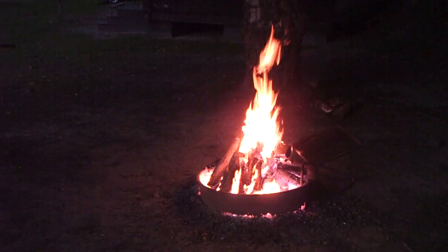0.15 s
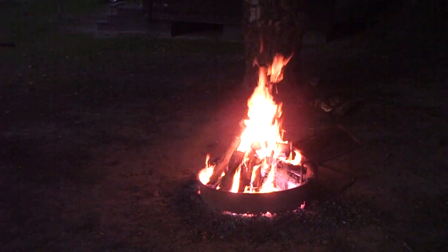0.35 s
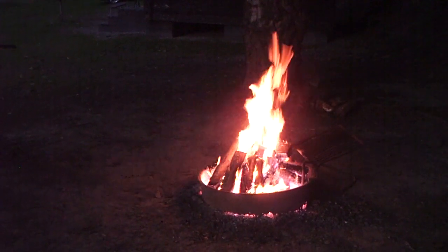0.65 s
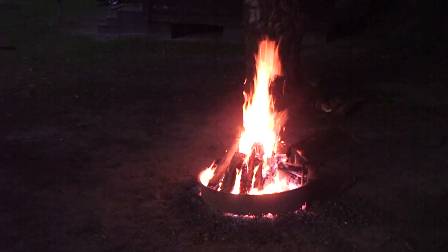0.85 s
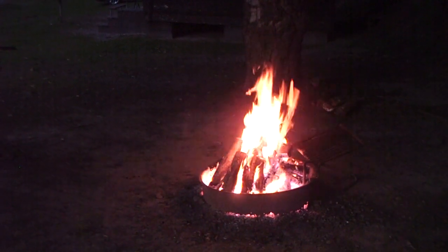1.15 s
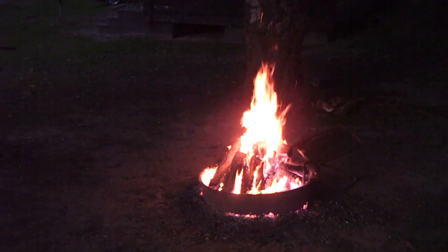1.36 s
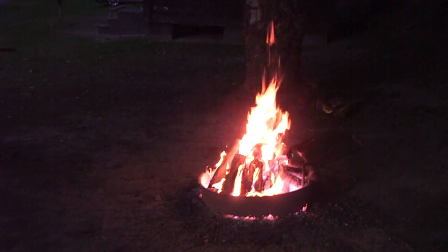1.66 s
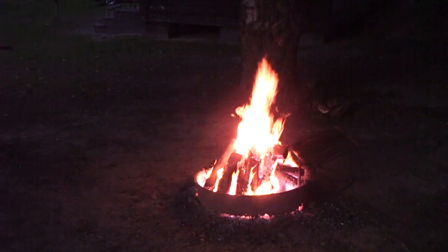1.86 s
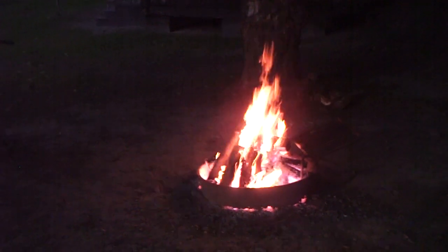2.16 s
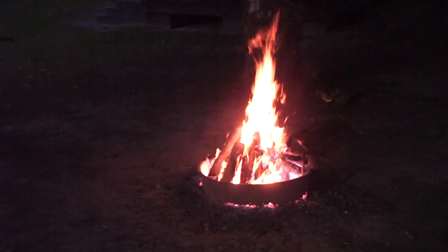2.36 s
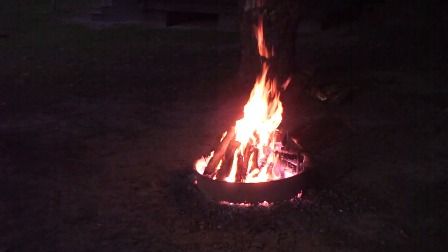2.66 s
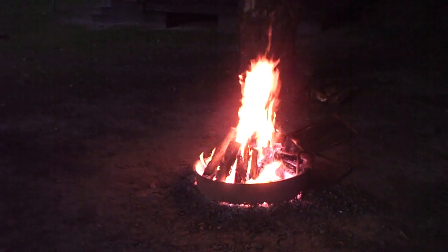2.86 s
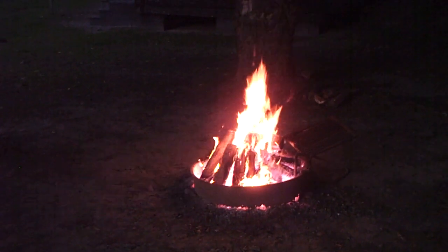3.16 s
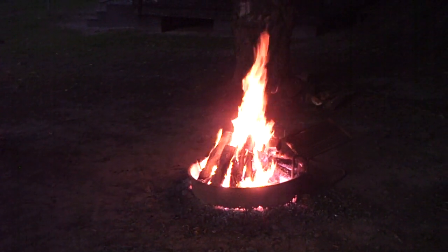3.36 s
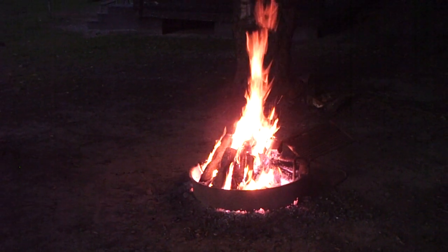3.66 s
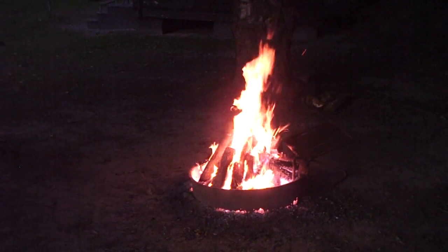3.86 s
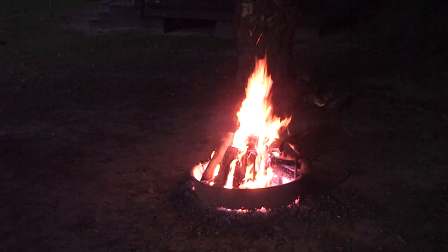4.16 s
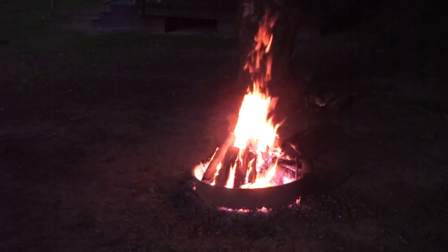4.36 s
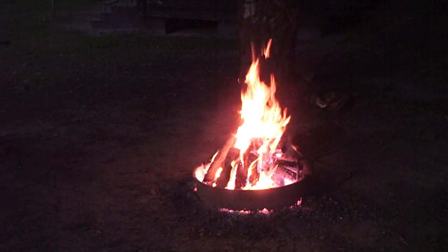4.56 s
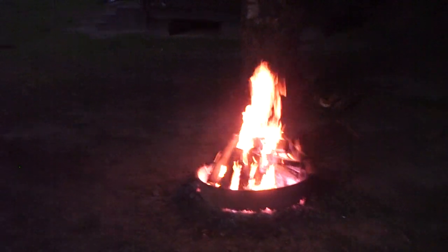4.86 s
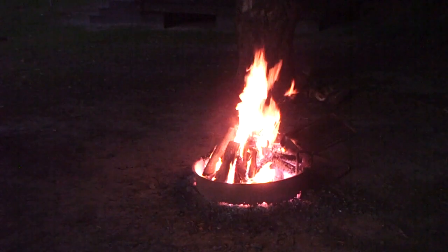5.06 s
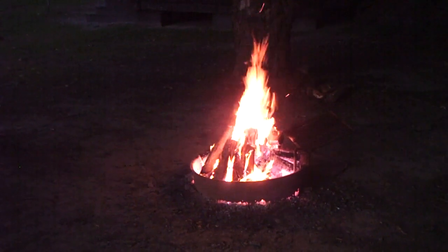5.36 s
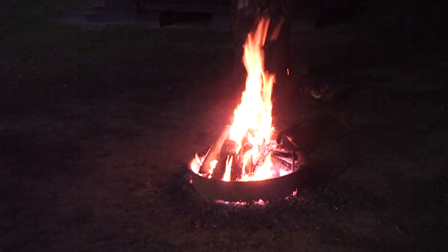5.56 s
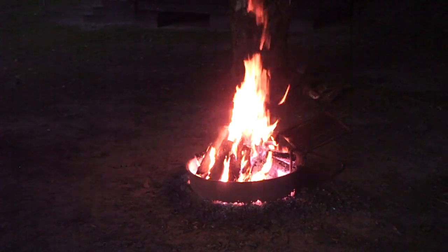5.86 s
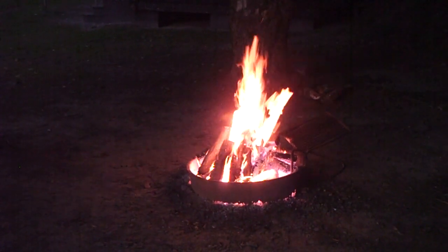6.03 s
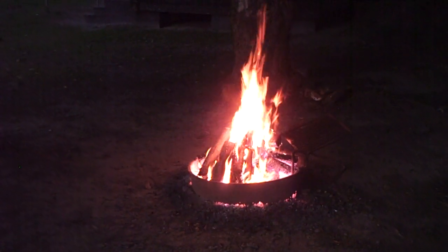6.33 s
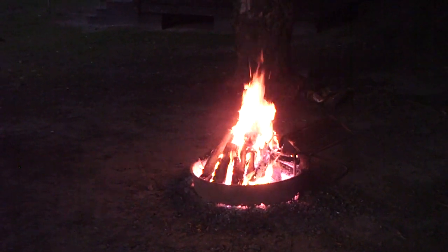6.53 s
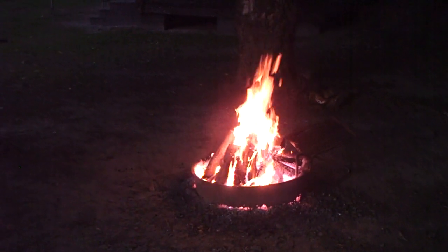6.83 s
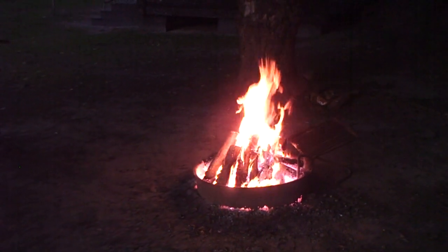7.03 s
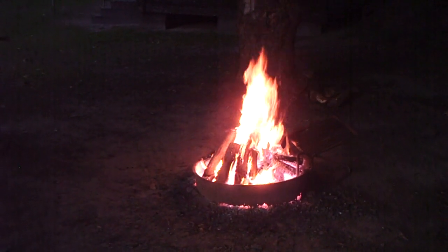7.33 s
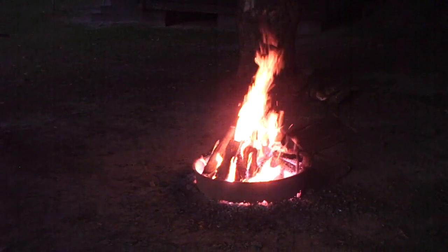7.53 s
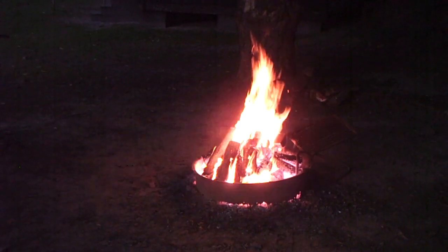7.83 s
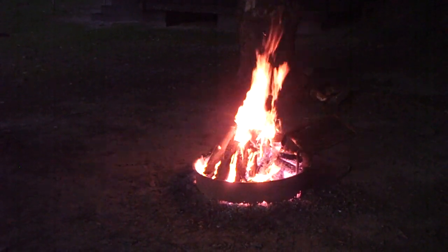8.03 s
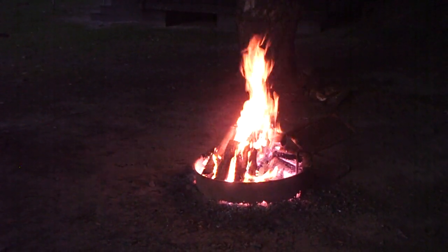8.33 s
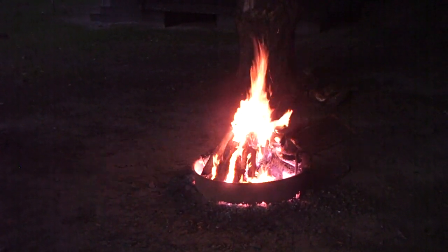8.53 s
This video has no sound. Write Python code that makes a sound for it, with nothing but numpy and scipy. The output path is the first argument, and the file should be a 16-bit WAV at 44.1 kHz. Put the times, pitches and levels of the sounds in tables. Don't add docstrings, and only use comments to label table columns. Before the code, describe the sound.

Outdoors at dusk, stereo microphones hear a campfire from a few metres, quiet and sparse, over soft hiss, thin far insect chorus and a deep fluttering engine rumble. Small snaps and woody knocks lead to a violent overloaded crack with short scattered echoes. Crackling resumes, a pop cluster flares around the middle, a cricket trills, steam squeals softly upward, then calmer pops and a low cricket close it.

```python
import sys
import numpy as np
from scipy import signal
from scipy.fft import rfft, irfft, next_fast_len
from scipy.io import wavfile
from scipy.ndimage import uniform_filter1d

SR = 44100
rng = np.random.default_rng(int(sys.argv[2]) if len(sys.argv) > 2 else 0)


def inscribe(sig):
    pcm = np.round(np.clip(np.atleast_2d(sig).T, -1, 1) * 32767)
    wavfile.write(sys.argv[1], SR, pcm.astype(np.int16))


def convert_level_to_amplitude(level_db):
    exponent = np.asarray(level_db, float) / 20
    return 10 ** exponent


N = 383229
T = np.arange(N) / SR
OPPOSED = np.array([[1], [-1]])


def level(x, db):
    return x * convert_level_to_amplitude(db) / np.sqrt(np.mean(x ** 2))


def peak(x, db):
    return x * convert_level_to_amplitude(db) / np.max(np.abs(x))


def colour(x, points):
    size = next_fast_len(N)
    hz, db = np.transpose(points)
    log_hz = np.log(np.arange(size // 2 + 1) * SR / size + 1)
    gain = convert_level_to_amplitude(np.interp(log_hz, np.log(hz), db, -200, -200))
    return irfft(rfft(x, size) * gain, size)[..., :N]


def band(x, hz, width_hz):
    return signal.lfilter(*signal.iirpeak(hz, hz / width_hz, fs=SR), x)


def band_twice(x, hz, width_hz):
    return band(band(x, hz, width_hz), hz, width_hz)


def walk(rate_hz):
    k = int(SR / rate_hz)
    held = np.repeat(rng.standard_normal(N // k + 1), k)
    return 1.6 * uniform_filter1d(uniform_filter1d(held, k), k)[:N]


def add(out, s, sound, pan_db):
    i = int(s * SR)
    out[:, i:i + sound.shape[-1]] += sound[..., :N - i] * convert_level_to_amplitude(OPPOSED * pan_db / 2)


# time in seconds, level in dB.
ENGINE_LOAD = [(0.0, -45), (0.09, -49), (0.87, -46.5), (1.04, -53), (1.23, -48), (4.72, -48), (4.74, -60),
               (4.81, -47), (5.23, -49), (5.54, -46), (5.57, -52), (6.07, -46), (6.27, -55), (6.32, -48.5),
               (7.6, -48.5), (7.65, -51), (7.72, -47), (8.69, -49.5)]
# frequency in Hz, rms level in dB.
MAINS_HUM = [(30.2, -64), (60.1, -57), (120., -67)]


def engine():
    spread = rng.standard_normal((N // 1000, 2)).T
    times = np.cumsum(1 + .13 * spread[0]) / 31.8 + .002
    inside = times < T[-1]
    firing = np.zeros(N)
    firing[(times[inside] * SR).astype(int)] = -convert_level_to_amplitude(2.9 * spread[1][inside])
    t = T[:1024] - T[512]
    dip = np.exp(-np.abs(t) / .0016) + 1.2 * np.exp(-(t / 0.0033) ** 2)
    dips = signal.fftconvolve(firing, dip, "same")
    dips = signal.sosfiltfilt(signal.butter(2, 24, "high", fs=SR, output="sos"), dips)
    rumble = colour(rng.standard_normal(N), [(8, -32), (18, 3.0), (60, -0.5), (110, -11), (200, -22.5),
                                             (400, -34.5), (900, -41)])
    hum = sum(np.sqrt(2) * convert_level_to_amplitude(db + 0.758 * walk(2.2)) * np.sin(2 * np.pi * hz * T) for hz, db in MAINS_HUM)
    surge_db, surge_rate_hz = 1.03, 14
    load_db = np.interp(T, *np.transpose(ENGINE_LOAD)) + 0.78 + surge_db * walk(surge_rate_hz)
    return (level(dips, -2.5) + level(rumble, -4.0)) * convert_level_to_amplitude(load_db) + hum


# frequency in Hz, density in dB per Hz.
AIR_SHARED = [(120, -108), (170, -86), (450, -103), (900, -104), (1250, -107), (1900, -107), (2700, -107.5),
              (3900, -107), (4400, -100), (4800, -92), (5100, -96), (6100, -111), (7400, -116),
              (13100, -117)]
# frequency in Hz, density in dB per Hz.
AIR_OPPOSED = [(150, -143), (290, -111), (900, -111), (1850, -115), (2300, -124), (3300, -117),
               (4200, -124), (4750, -101), (5050, -101), (5600, -117), (6500, -115), (8300, -117),
               (13100, -117)]


def air():
    embers = (rng.random(N) < 80 / SR) * rng.uniform(-1, 1, N) * 10
    mid = colour(rng.standard_normal(N) * convert_level_to_amplitude(0.34 * walk(4.4)) + embers, AIR_SHARED)
    side = colour(rng.standard_normal(N), AIR_OPPOSED)
    return (mid + side * OPPOSED) * np.sqrt(SR / 2)


def trill(hz, rate_hz, duty, droop_hz):
    phase = np.cumsum(rate_hz * (1 + .008 * walk(7.2))) / SR % 1
    stroke = np.sin(np.pi * np.minimum(phase / duty, 1)) ** 2
    tone = np.sin(2 * np.pi * np.cumsum(hz - droop_hz * (phase / duty - .5)) / SR)
    return level(stroke * tone * convert_level_to_amplitude(0.7 * walk(40)), 0)


def song(rows):
    attack_s, release_s = .25, .05
    out = np.zeros(N)
    for start, end, *db in rows:
        swell = np.clip(np.minimum((T - start) / attack_s, (end - T) / release_s), 0, 1)
        out += swell * convert_level_to_amplitude(np.interp(T, (start, end), db))
    return out


# start in seconds, end in seconds, level at start in dB, level at end in dB.
LOW_SONGS = [
    (2.1, 3.95, -67.5, -70),
    (6.98, 9.0, -69, -68),
]
# start in seconds, end in seconds, level at start in dB, level at end in dB.
HIGH_SONGS = [
    (4.91, 6.25, -58.5, -60),
]


def insects():
    low = trill(2450, 43.8, .92, 80) * song(LOW_SONGS) * convert_level_to_amplitude(-3.5)
    high = trill(4800, 59.5, .6, 300) * song(HIGH_SONGS) * convert_level_to_amplitude(-5.0)
    noise = rng.standard_normal((3, N))
    far = band_twice(noise[:2], 7900, 200)
    drone = band_twice(noise[2], 2290, 380) * convert_level_to_amplitude(1.3 * walk(1.5))
    far_chorus = level(far + .25 * far[::-1], -80.5) + level(drone, -76)
    return low * convert_level_to_amplitude(-.4 * OPPOSED) + high + far_chorus


# time in seconds, level in dB.
GAS_FLARES = [
    (0.004, -50),
    (2.63, -45.5),
    (3.73, -65),
    (4.86, -45),
    (7.09, -59),
    (8.28, -63),
    (8.37, -62),
]


def flame():
    rise_s, fall_s = 0.019, .05
    roar = band(rng.standard_normal(N), 330, 220) * convert_level_to_amplitude(2.5 * walk(11))
    gain = convert_level_to_amplitude(-68 + 2.3 * walk(1.6))
    for s, db in GAS_FLARES:
        gain += convert_level_to_amplitude(db) * np.exp(-np.maximum((s - T) / rise_s, (T - s) / fall_s))
    return level(roar, -10.0) * gain


# start in seconds, peak in dB, pitch in Hz, t60 in seconds.
LOG_KNOCKS = [(.138, -45, 560, 0.038), (.343, -50, 417, 0.021), (.475, -53, 453, .04),
              (.519, -51, 480, 0.062), (1.155, -40, 836, 0.039), (1.48, -50.5, 450, 0.028),
              (2.15, -54.5, 1030, .04), (2.19, -54.5, 883, .04), (2.26, -52, 552, 0.053),
              (2.637, -40, 680, .03), (3.718, -50.5, 647, 0.047), (4.833, -46.5, 400, 0.033),
              (4.864, -44, 713, 0.15), (5.959, -54.5, 630, 0.073), (7.076, -46.5, 562.6, .05),
              (7.84, -49, 240, 0.12), (7.939, -64, 624, 0.057), (8.203, -51.5, 623, .05),
              (8.26, -52, 266.6, 0.13), (8.355, -48.5, 275, 0.38)]


def knocks():
    out, t = np.zeros((2, N)), T[:4096]
    for s, db, hz, t60_s in LOG_KNOCKS:
        fade = np.exp(-np.log(1000) * t / np.clip(t60_s, .01, .2))
        noise = rng.standard_normal(len(t)) * fade ** 2
        rattle = peak(band(band(noise, 0.52 * hz, 1.6 * hz), 1.18 * hz, 0.64 * hz), 0.96)
        add(out, s, peak(np.sin(2 * np.pi * hz * t) * fade + rattle, db), 0)
    return out


# start in seconds, peak in dB, thump in dB relative to the peak,
# brightness in dB per octave above.
SAP_POPS = [(0.188, -62, 4, -12), (0.3433, -37.5, -30, 0), (0.606, -52, -5, -10), (0.7354, -49, -7, -3),
            (0.7579, -46, -4, -6), (0.9293, -47, -17, -4), (1.1548, -45, 2, -12), (1.248, -59, -12, 11),
            (1.3327, -42, -15, -10), (1.482, -39, -15, 6), (1.8804, -48, -18, -2), (2.4376, -59, 10, 5),
            (2.5795, -39.5, -10, -6), (2.7646, -39.5, -16, 7), (3.1558, -41, -24.5, -15),
            (3.718, -42, -20, -3), (4.0775, -45, -21, -4), (4.1154, -50, 1, 2), (4.2962, -43, -13, 10),
            (4.8204, -41, -17, -14), (4.834, -34.5, -14, 1), (4.8492, -33, -25, 2), (4.865, -39, -6, 7),
            (4.8732, -37, -6, 8), (5.242, -49, -0.5, 6), (5.4041, -47.5, -9, 9.5), (5.9595, -39.5, -16, -5),
            (7.077, -44.5, -3, -1), (7.6605, -51, -0.5, 5), (8.2039, -31, -10, -18)]
# start in seconds, peak in dB.
FAINT_TICKS = [(0.1524, -67), (0.2173, -64), (0.4081, -64), (1.3059, -55), (1.4534, -60), (1.8476, -59),
               (1.8722, -52), (2.0486, -49), (2.7499, -50), (3.0265, -47.5), (3.2782, -52), (3.5718, -54.5),
               (4.1394, -47), (4.9016, -54), (5.431, -50), (6.3609, -57), (6.4996, -59), (6.5366, -47),
               (6.941, -55), (8.0481, -58), (8.22, -58)]


def pops():
    out, t = np.zeros((2, N)), T[:2048]
    tick_thump_db, tick_bright_db = -12, -0.5
    ticks = [(s, db, tick_thump_db, tick_bright_db) for s, db in FAINT_TICKS]
    for s, db, thump_db, bright_db in SAP_POPS + ticks:
        debris = np.exp(-t / .0009) + convert_level_to_amplitude(-14.0) * np.exp(-t / 0.011)
        burst = rng.standard_normal(len(t)) * debris
        pan_db = 0.94 * burst[1]
        burst[0] += 5
        zones = ((1750, 1300, thump_db), (2810, 1600, 0), (4830, 1500, .8 * bright_db - 0.1),
                 (6800, 2200, 1.277 * bright_db - 13.5))
        pop = sum(peak(band_twice(burst, hz, width_hz), db + zone_db - 3.0) for hz, width_hz, zone_db in zones)
        add(out, s + 0.00061, pop, pan_db)
    return out


# start in seconds, peak in dB, length in seconds, centre in Hz.
STEAM_SPITS = [(0.189, -61.5, 0.079, 4470), (0.761, -63, 0.13, 4460), (1.33, -59.5, 0.049, 4500),
               (1.869, -52.5, 0.074, 4700), (1.99, -60, 0.04, 6500), (2.442, -59, 0.043, 4000),
               (2.579, -54, 0.086, 4000), (2.84, -50, 0.047, 4800), (2.93, -56.5, 0.081, 5000),
               (4.679, -59.5, 0.064, 2960), (4.847, -48, 0.05, 4870), (5.221, -55, 0.046, 3500),
               (6.534, -52, 0.021, 4500), (6.932, -61, 0.055, 4140), (8.211, -64, 0.077, 2970),
               (8.6, -61.5, .04, 5100)]


def spits():
    out, t = np.zeros((2, N)), T[:8192]
    for s, db, length_s, hz in STEAM_SPITS:
        noise = rng.standard_normal((3, len(t)))
        ragged = convert_level_to_amplitude(4.2 * 8.7 * uniform_filter1d(noise[2], size=64))
        shape = np.clip(np.minimum(t / 0.0086, (length_s - t) / 0.035), 0, 1) * ragged
        wide = noise[0] + 0.36 * noise[1] * OPPOSED
        add(out, s, convert_level_to_amplitude(db + 3.0) * band_twice(wide * shape, hz, 3500), 0)
    return signal.sosfilt(signal.butter(6, 7800, fs=SR, output="sos"), out)


# start in seconds, peak in dB.
CRACK_SPLITS = [
    (2.6363, -26),
    (2.635, -27.5),
    (2.6363, -14),
    (2.6356, -17.5),
    (2.6373, 0.5),
    (2.6377, 2.8),
    (2.6455, -31.5),
    (2.6465, -26),
    (2.649, -33),
    (2.659, -33.5),
]
# frequency in Hz, width in Hz, level in dB.
CRACK_MODES = [(1580, 730, -33), (2090, 400, -29.5), (3260, 600, -25.5), (4324, 700, -18),
               (4950, 990, -0.5), (5697, 600, -13.5), (7160, 800, -16.5), (10000, 1500, -51.5)]


def crack():
    out, t = np.zeros((2, N)), T[:8192]
    body = sum(convert_level_to_amplitude(db) * width_hz * np.sin(2 * np.pi * hz * t) * np.exp(-np.pi * width_hz * t)
               for hz, width_hz, db in CRACK_MODES)
    body = peak(body * np.minimum(t / 0.00032, 1), 0)
    dull = band(body, 5000, 1500)
    for s, db in CRACK_SPLITS:
        is_echo = s > CRACK_SPLITS[5][0]
        add(out, s, convert_level_to_amplitude(db) * (dull if is_echo else body), 1.2)
    fade = convert_level_to_amplitude(-47) * np.exp(-t / 0.0015) + convert_level_to_amplitude(-48.5) * np.exp(-t / 0.026)
    scatter = rng.standard_normal((2, len(t))) * fade
    scatter = band(scatter + 0.97 * scatter[::-1], 5000, 1300)
    echoes = signal.fftconvolve(scatter, body[None, :512])[:, :len(t)]
    add(out, CRACK_SPLITS[2][0] + .001, echoes, 0)
    return np.array([np.roll(out[0], 1), out[1]])


def whistle():
    start_s, length_s, attack_s, release_s = 5.6, 0.53, .06, .22
    from_hz, to_hz, climb_s = 1945, 2290, .17
    overtone_at_s, overtone_span_s = 5.74, .06
    t = T - start_s
    hz = to_hz - (to_hz - from_hz) * np.exp(-np.maximum(t, 0) / climb_s)
    on = np.clip(np.minimum(t / attack_s, (length_s - t) / release_s), 0, 1)
    third = convert_level_to_amplitude(-7) * np.exp(-((T - overtone_at_s) / overtone_span_s) ** 2)
    phase = 2 * np.pi * np.cumsum(hz * (1 + .006 * walk(120))) / SR
    flutter = 1.2 + 0.5 * walk(400)
    return on * convert_level_to_amplitude(-68) * (flutter * np.sin(phase) + third * np.sin(3 * phase))


def scene():
    steady = engine() + air() + insects() + flame()
    return steady + knocks() + pops() + spits() + crack() + whistle()


def overload(x):
    over = x - np.clip(x, -1, 1)
    over = signal.sosfiltfilt(signal.butter(3, 10500, fs=SR, output="sos"), over)
    return np.clip(x - 1.15 * over, -1, 1)


def thin(x):
    share, above_db, cut_db, from_hz, to_hz = .26, 12, -30, 1800, 13071
    f, _, z = signal.stft(x, SR, nperseg=2048)
    chance = np.repeat(rng.standard_normal((171, z.shape[2])), repeats=6, axis=0)
    chance = uniform_filter1d(chance, size=4, axis=1)[:len(f)]
    power = uniform_filter1d(np.abs(z[0]) ** 2, size=6, axis=0)
    faint = power < convert_level_to_amplitude(2 * above_db) * np.median(power[(f > from_hz) & (f < to_hz)])
    dropped = faint & (chance < np.quantile(chance, share)) & (f > from_hz)[:, None]
    return signal.istft(z * np.where(dropped, convert_level_to_amplitude(cut_db), 1), SR, nperseg=2048)[1][:, :N]


def band_limit(x):
    return signal.sosfilt(signal.butter(12, 13071, fs=SR, output="sos"), x)


def record(dry):
    left, right = overload(dry)
    mid, side = thin(np.array([left + right, left - right]) / 2)
    return band_limit(np.array([mid + side, mid - side]))


dry = scene()
out = record(dry)
inscribe(out)
```